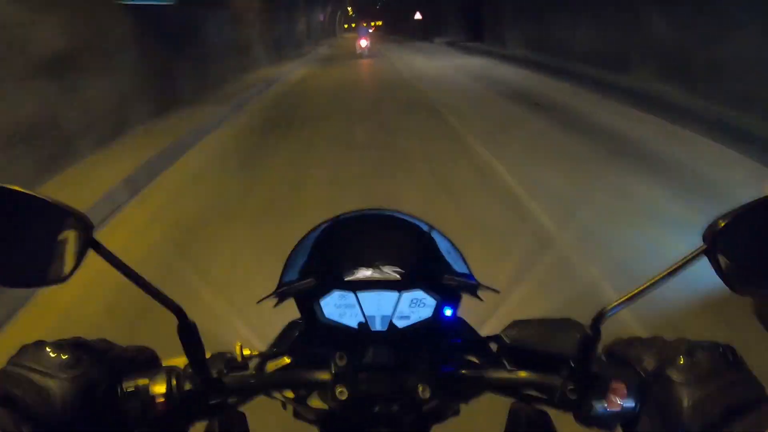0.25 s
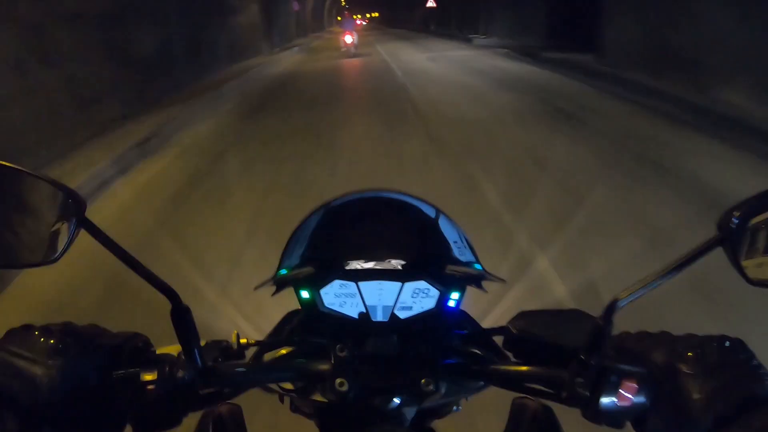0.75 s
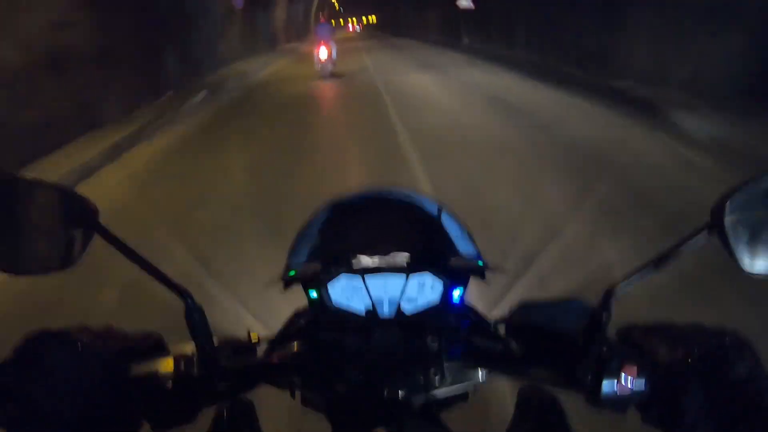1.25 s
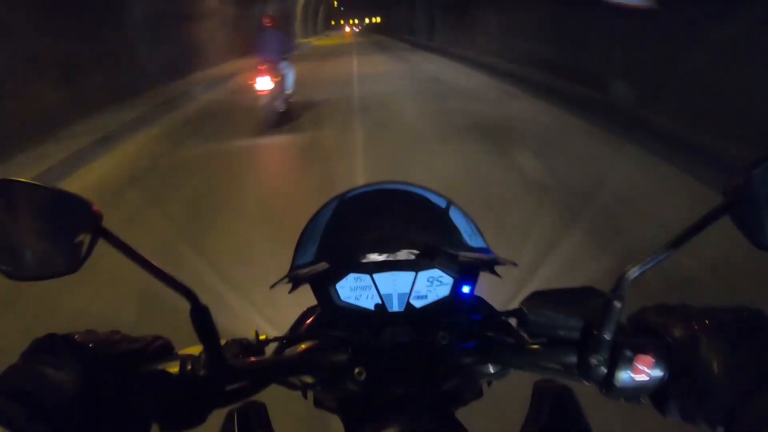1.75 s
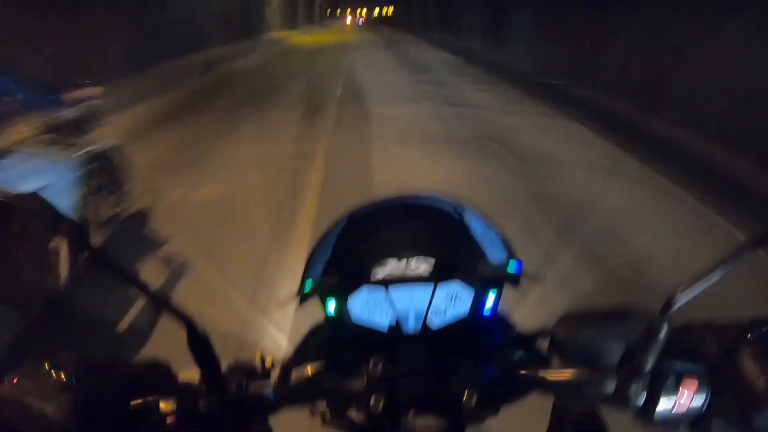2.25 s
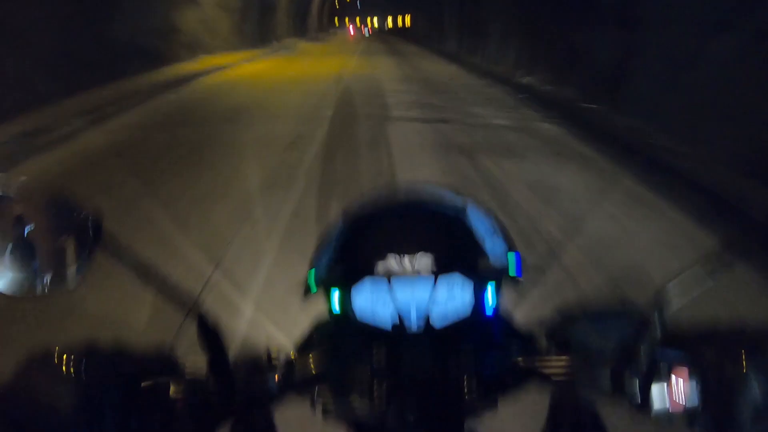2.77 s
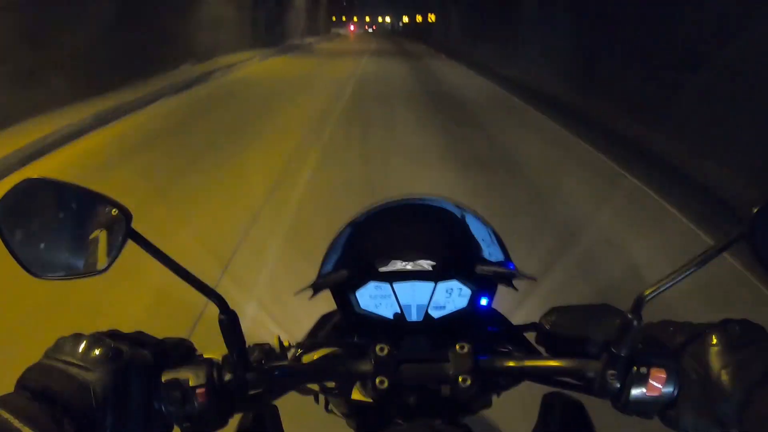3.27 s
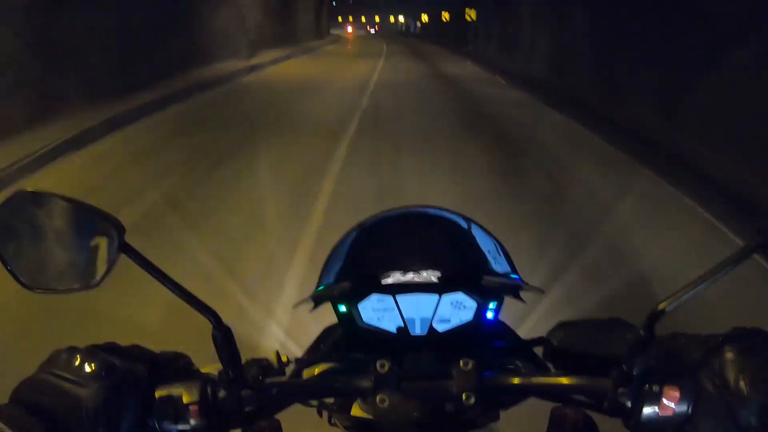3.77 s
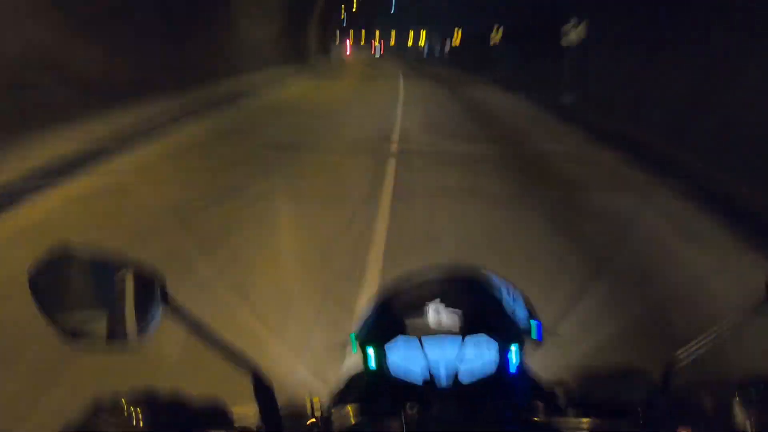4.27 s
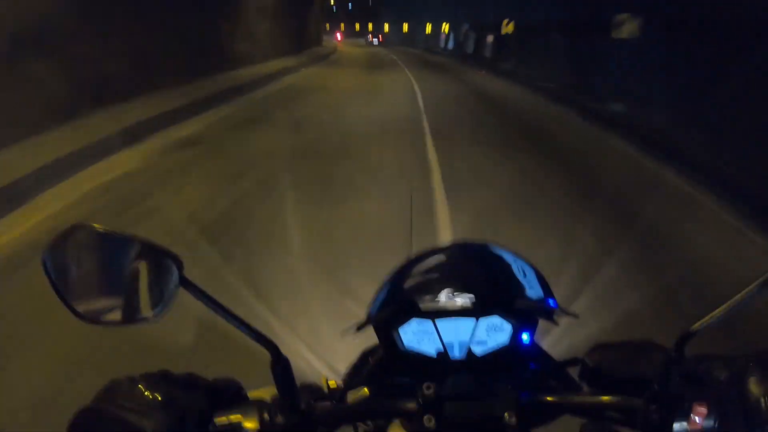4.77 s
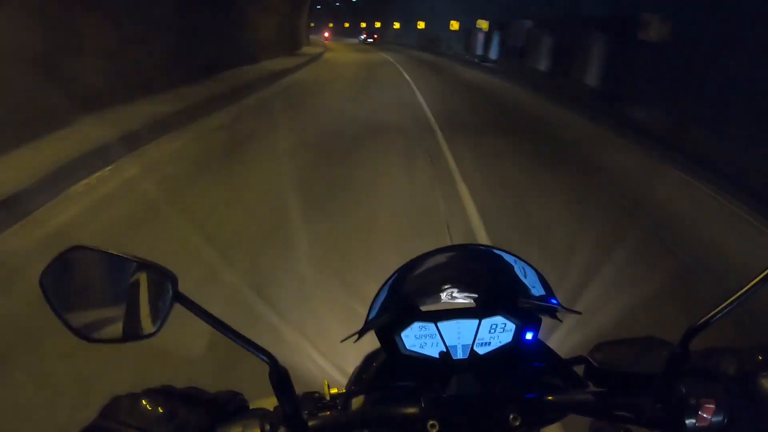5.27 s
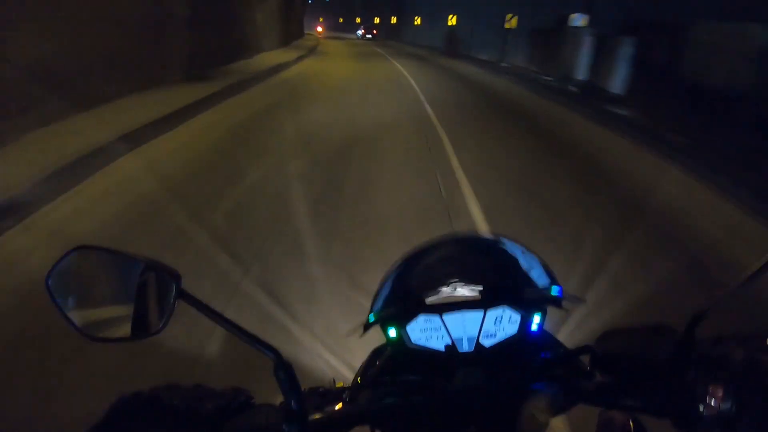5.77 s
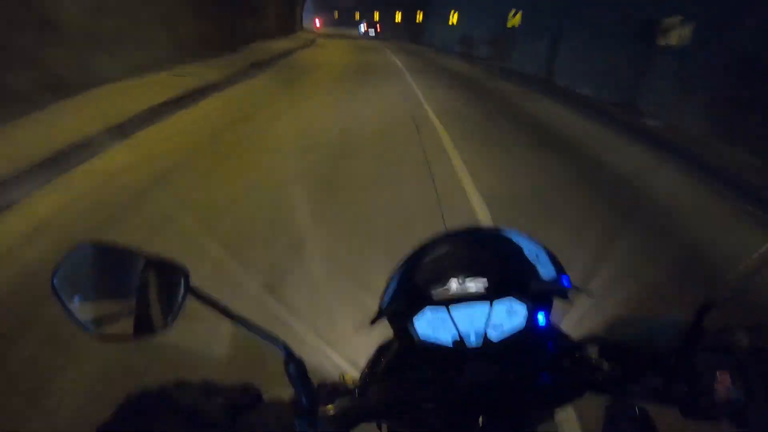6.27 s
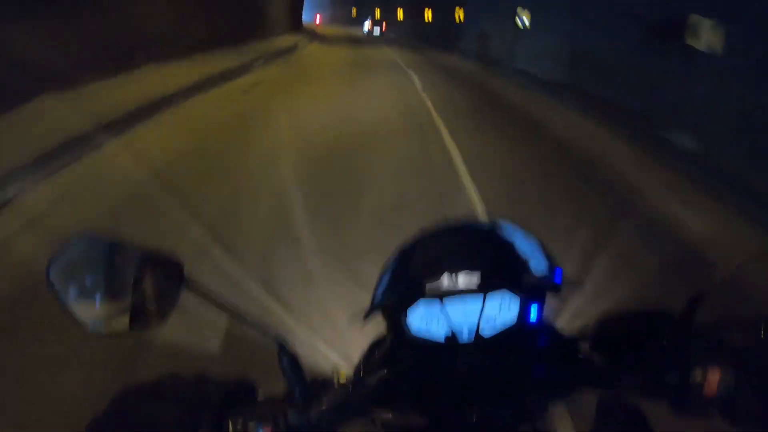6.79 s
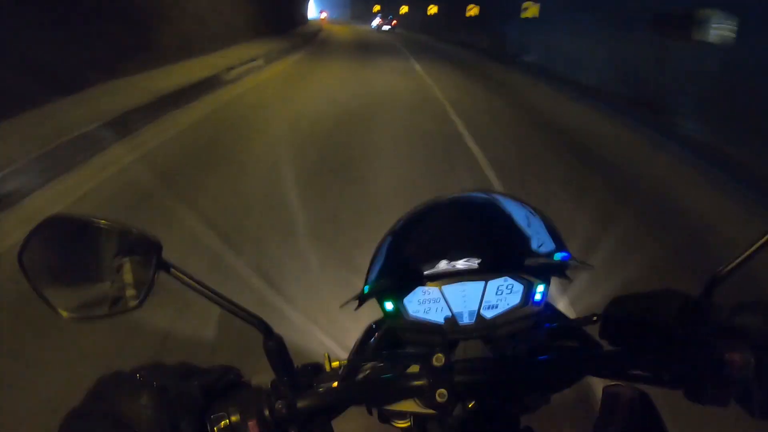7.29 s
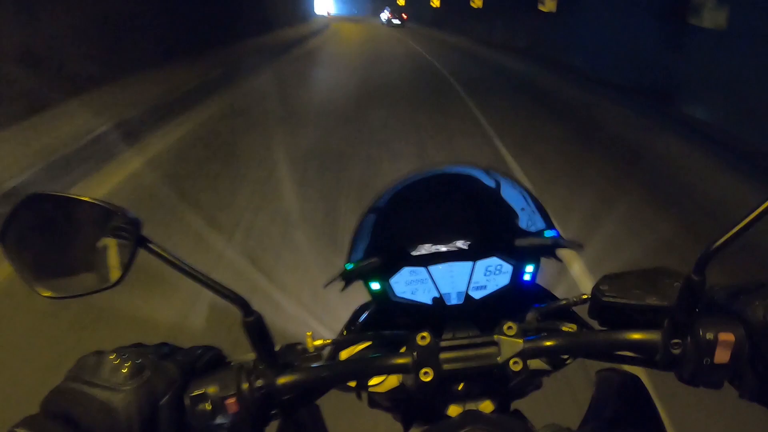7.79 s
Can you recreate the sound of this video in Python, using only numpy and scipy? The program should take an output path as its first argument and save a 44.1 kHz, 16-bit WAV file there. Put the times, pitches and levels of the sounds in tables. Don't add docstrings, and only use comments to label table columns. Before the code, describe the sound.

A motorcycle engine pulls hard inside a road tunnel, surges twice, then coasts down in pitch amid tyre roar and wind buffeting the microphone.

```python
import sys
import numpy as np
from scipy import signal
from scipy.fft import rfft, irfft, next_fast_len
from scipy.io import wavfile

SR = 44100
rng = np.random.default_rng(int(sys.argv[2]) if len(sys.argv) > 2 else 0)


def voltage_ratio(level):
    return 10 ** (np.asarray(level, float) / 20)


def wav_record(signal):
    frames = np.transpose(np.atleast_2d(signal))
    bounded = np.clip(frames, -1, 1)
    quanta = np.round(bounded * 32767).astype(np.int16)
    wavfile.write(sys.argv[1], SR, quanta)


N = 354563
TIME_S = np.arange(N) / SR

# time in seconds, firing rate in Hz.
FIRING_RATE = [(0, 186), (.25, 191), (1.0, 197.5), (1.35, 204.5), (1.62, 213.8), (2.1, 211.2), (2.6, 202.8),
               (2.78, 204), (2.95, 209.6), (3.25, 211.4), (3.8, 206), (4.3, 195.8), (5.0, 184),
               (5.6, 175.2), (6.45, 161.8), (7.0, 152.6), (7.75, 148.6), (8.04, 149.4)]
# time in seconds, throttle 0-1.
THROTTLE = [(0, 0.76), (.4, 0.76), (.9, 0.71), (1.15, 0.95), (1.5, 0.91), (1.86, 0.85), (2.0, 0.4),
            (2.2, 0.22), (2.66, 0.11), (2.76, 0.64), (3.05, 0.91), (3.33, 0.68), (3.55, 0.37), (4.1, 0),
            (4.6, 0), (5.5, 0.23), (7.0, 0), (7.55, 0.22), (7.74, 0.43), (8.04, 0.5)]
# multiple of the firing rate, level in dB within the group.
GROWL_ORDERS = [(3, 2.5)]
# multiple of the firing rate, level in dB within the group.
BARK_ORDERS = [(4, -3), (5, -3.5), (6, -2.5), (7, -3), (8, -6.5), (9, -10.5)]
# multiple of the firing rate, level in dB.
CRANK_ORDERS = [(.25, -43.5), (.5, -31), (.75, -50)]
# centre in Hz, width in Hz, level in dB against the bark.
AIR_BOX = [(2723, 390, -8.5), (5370, 140, -25)]
# frequency in Hz, level in dB.
SILENCER = [(149, -19.5), (154, -21.5), (161, -10.5), (168, -19.5), (176, -13.5), (186, -13), (197, -11),
            (212, -10.5)]
# frequency in Hz, level in dB.
TAIL_PIPE = [(297, -15), (304, -12), (320, -17), (336, -19.5), (352, -30), (385, -25.5), (405, -30.5),
             (425, -30.5)]
# frequency in Hz, level in dB.
HEADER = [(445, -40), (480, -45.5), (540, -44.5), (575, -40), (600, -50), (635, -49)]
# frequency in Hz, level in dB.
SIDE_COVER = [(187, -39.5), (207, -26.5), (222, -9), (232, -37), (247, -17), (256, -24), (266, -16)]
# time in seconds, share 0-1.
SCATTER = [(0, .4), (1.9, .55), (2.05, .2), (2.7, .25), (3.5, .6), (4.1, .3), (5.5, .3), (6, .2),
           (8.04, .12)]
# time in seconds, change in dB, length in seconds.
WALL_BAYS = [(0.127, 1.5, .15), (0.744, -6.5, .1), (1.037, -9.5, .1), (1.593, 6.5, .1), (1.912, -8.5, .08),
             (2.197, 4, .06), (2.52, 1.5, .08), (3.06, 9, .07), (3.343, -3, .1), (3.547, 5.5, .05),
             (3.877, -6.5, .05), (4.74, -4.5, .06), (5.01, -2.5, .08), (5.605, 4, .08), (6.872, 4.5, .06),
             (7.6, 1, .08)]
# time in seconds, level in dB.
AIRFLOW = [(0.0, -39.5), (0.02, -44), (0.65, -42), (0.71, -43.5), (1.19, -39.5), (2.75, -45.5), (3.0, -43),
           (3.78, -46.5), (3.94, -45.5), (4.5, -50), (5.51, -45), (5.75, -47.5), (6.2, -45), (7.37, -47.5),
           (7.45, -51), (7.68, -50.5), (8.02, -55.5), (8.04, -48.5)]
# time in seconds, level in dB.
GUSTS = [(0.0, -24), (0.2, -17.5), (1.34, -13), (1.36, -22.5), (1.61, -17), (1.77, -24), (1.81, -17),
         (2.57, -23), (2.84, -17.5), (4.66, -24), (5.1, -17), (5.78, -23), (5.87, -14), (6.54, -25),
         (7.14, -12), (8.04, -20.5)]
# frequency in Hz, density in dB per Hz.
BUFFET_COLOUR = [(4, -4.5), (10, 6), (22, 0), (50, -5.5), (72, -9.5), (112, -8.5), (135, -8), (200, -19),
                 (330, -19.5), (500, -49.5)]
# frequency in Hz, density in dB per Hz.
ROAR_COLOUR = [(100, -21.5), (200, 4.5), (330, 1), (450, 3), (600, -3), (900, -7.5), (1300, -11),
               (1800, -11), (2100, -27), (3000, -61)]
# frequency in Hz, density in dB per Hz.
RASP_COLOUR = [(500, -26), (900, 6), (1400, 11.5), (1800, 5.5), (2200, 0), (3000, -0.5), (3600, -4.5),
               (4000, -6.5), (4600, -37.5)]
# frequency in Hz, density in dB per Hz.
HISS_COLOUR = [(2500, -22.5), (4000, -2.5), (5000, 3.5), (6100, 0), (7000, -2), (8000, -4.5), (10000, -7.5),
               (12000, -13), (14000, -18.5), (15700, -36)]
# time in seconds, knock in dB, rattle in dB, length in seconds.
JOLTS = [
    (2.535, -33, -45, .02),
    (2.78, -36, -46, .012),
    (3.22, -36, -48, .015),
    (3.48, -38, -48, .015),
    (4.174, -25, -50, .014),
    (4.33, -31, -49, .016),
    (5.07, -36, -54, .04),
    (3.98, -35, -54, .06),
]
# frequency in Hz, density in dB per Hz.
KNOCK_COLOUR = [(600, -16), (1100, -3), (1700, 0), (2200, -10), (3200, -17), (4000, -23), (5000, -30)]
# centre in Hz, width in Hz, depth in dB.
HOUSING_DIPS = [(4140, 800, -6.5), (5600, 270, -7)]


def rms_one(x):
    return x / np.sqrt(np.mean(np.abs(x) ** 2) + 1e-20)


def in_time(rows):
    time_s, value = np.transpose(rows)
    return np.interp(TIME_S, time_s, value)


def at_hz(points, hz):
    point_hz, point_db = np.transpose(points)
    return np.interp(np.log(hz), np.log(point_hz), point_db)


def bell(centre_s, length_s):
    return np.exp(-((TIME_S - centre_s) / length_s) ** 2)


def drift(rate_hz):
    pole = np.exp(-2 * np.pi * rate_hz * 20 / SR)
    noise = rng.standard_normal(N // 20 + 4002)
    slow = signal.lfilter([1], [1, -2 * pole, pole ** 2], noise)[4000:]
    return np.interp(np.arange(N) / 20, np.arange(len(slow)), rms_one(slow))


def coloured(points):
    size = next_fast_len(N)
    hz = np.maximum(np.fft.rfftfreq(size, 1 / SR), 1)
    point_hz, point_db = np.transpose(points)
    gain_db = np.interp(np.log(hz), np.log(point_hz), point_db, left=-120, right=-120)
    return rms_one(irfft(rfft(rng.standard_normal(size)) * voltage_ratio(gain_db), size)[:N])


def tone(phase, scatter, width_hz):
    share = np.clip(scatter, 0, 1)
    in_step = np.sqrt(1 - share) + np.sqrt(share / 2) * drift(width_hz)
    across = np.sqrt(share / 2) * drift(width_hz)
    return np.sqrt(2) * (in_step * np.cos(phase) + across * np.sin(phase))


def resonance(hz, scatter, width_hz):
    return tone(2 * np.pi * hz * TIME_S, scatter, width_hz)


def buffeting():
    gust_db = in_time(GUSTS)
    level_db = -17.5 + 0.83 * (gust_db - gust_db.mean()) + 0.75 * drift(1.1)
    out = voltage_ratio(level_db) * coloured(BUFFET_COLOUR)
    out += voltage_ratio(level_db - 13.5) * resonance(43.9, scatter=1, width_hz=6.7)
    return out + voltage_ratio(level_db - 9.5) * resonance(112, scatter=0.93, width_hz=5)


def screen_boom(first_db):
    level_db = -20.5 + 0.7 * (first_db - first_db.mean()) + 1.5 * drift(2.3)
    return voltage_ratio(level_db) * resonance(215, scatter=0.99, width_hz=22.7)


def airflow_hiss(flow_db, gust):
    level_db = -47 + 0.95 * flow_db + 0.28 * gust + 0.5 * drift(13)
    return voltage_ratio(level_db) * coloured(HISS_COLOUR)


def tyre_roar(flow_db, speed_hz, throttle):
    level_db = -26.5 + 0.7 * flow_db + 2 * throttle + 0.0265 * speed_hz + 0.38 * drift(18)
    return voltage_ratio(level_db) * coloured(ROAR_COLOUR)


def rasp(phase, flow_db, speed_hz, throttle, gust):
    level_db = -34 + 0.7 * flow_db - 0.5 * throttle + 0.0823 * speed_hz
    level_db += 0.15 * gust + 1.1 * drift(9.9)
    puff = 1 + 0.22 * throttle ** 2 * np.cos(phase)
    return voltage_ratio(level_db) * puff * coloured(RASP_COLOUR)


def chain_whirr(flow_db, speed_hz):
    return voltage_ratio(-49 + flow_db - 0.14 * speed_hz) * resonance(3195, scatter=1, width_hz=280)


def jolts():
    knock = sum(voltage_ratio(knock_db) * bell(s, length_s) for s, knock_db, _, length_s in JOLTS)
    rattle = sum(voltage_ratio(rattle_db) * bell(s, length_s) for s, _, rattle_db, length_s in JOLTS)
    return knock * coloured(KNOCK_COLOUR) + rattle * coloured(HISS_COLOUR)


def wall_echoes(phase, first_db, second_db):
    ahead = voltage_ratio(first_db - 8) * tone(1.1 * phase, scatter=1, width_hz=9)
    behind = voltage_ratio(second_db - 8) * tone(1.8 * phase, scatter=0.99, width_hz=14)
    return ahead + behind


def uneven_cylinders(phase, firing_hz, throttle):
    quarter_db = at_hz(SIDE_COVER, 5 / 4 * firing_hz) - 7.5 * throttle
    half_db = -35.5 + 8.5 * throttle
    out = voltage_ratio(quarter_db) * tone(5 / 4 * phase, scatter=0.69, width_hz=2.4)
    return out + voltage_ratio(half_db) * tone(3 / 2 * phase, scatter=0.4, width_hz=6)


def crank(phase):
    return sum(voltage_ratio(db) * tone(k * phase, scatter=1, width_hz=6.3) for k, db in CRANK_ORDERS)


def air_box(firing_hz, bark_db):
    drive_db = bark_db + 0.28 * (bark_db + 24) + 0.34 * (firing_hz - firing_hz.max())
    return sum(voltage_ratio(drive_db + db) * resonance(hz, 1, width_hz) for hz, width_hz, db in AIR_BOX)


def exhaust(phase, firing_hz, throttle, first_db, second_db, bark_db):
    share = in_time(SCATTER)
    overrun = .012 * np.maximum(firing_hz - 156, 0) * (1 - throttle)
    pulse = phase + .12 * drift(14)
    growl_db = at_hz(HEADER, 3 * firing_hz) + 21.5 * throttle
    out = voltage_ratio(first_db) * tone(phase, .65 * share, width_hz=17)
    out += voltage_ratio(second_db) * tone(2 * phase, share + overrun, width_hz=17)
    for k, db in GROWL_ORDERS:
        out += voltage_ratio(growl_db + db) * tone(k * pulse, scatter=.28, width_hz=22)
    for k, db in BARK_ORDERS:
        out += voltage_ratio(bark_db + db) * tone(k * pulse, scatter=.36, width_hz=5 * k)
    return out


def scene():
    firing_hz = in_time(FIRING_RATE)
    throttle = np.clip(in_time(THROTTLE), 0, 1)
    phase = 2 * np.pi * np.cumsum(firing_hz) / SR
    first_db = at_hz(SILENCER, firing_hz) - 8.5 * throttle
    first_db += sum(db * bell(s, length_s) for s, db, length_s in WALL_BAYS)
    second_db = at_hz(TAIL_PIPE, 2 * firing_hz) + 11 * throttle
    bark_db = -53.5 + 29.5 * throttle

    flow_db = in_time(AIRFLOW)
    flow_db = flow_db - flow_db.mean()
    speed_hz = firing_hz - firing_hz.mean()
    gust = drift(11)

    mix = buffeting() + screen_boom(first_db)
    mix += airflow_hiss(flow_db, gust)
    mix += tyre_roar(flow_db, speed_hz, throttle)
    mix += rasp(phase, flow_db, speed_hz, throttle, gust)
    mix += chain_whirr(flow_db, speed_hz) + jolts()
    mix += wall_echoes(phase, first_db, second_db)
    mix += uneven_cylinders(phase, firing_hz, throttle)
    mix += crank(phase) + air_box(firing_hz, bark_db)
    mix += exhaust(phase, firing_hz, throttle, first_db, second_db, bark_db)
    return mix[None]


def top_cut(x):
    return signal.sosfilt(signal.butter(12, 15719, fs=SR, output="sos"), x)


def record(dry):
    x = dry
    for hz, width_hz, depth_db in HOUSING_DIPS:
        b, a = signal.iirpeak(hz, hz / width_hz, fs=SR)
        x = x - (1 - voltage_ratio(depth_db)) * signal.lfilter(b, a, x)
    power = signal.lfilter([.0008], [1, -1 + 0.00071], x ** 2) + 1e-6
    x = x * np.minimum(1, (voltage_ratio(-11.5) / power) ** 0.28)
    x = 1.07 * np.tanh(x / 1.07)
    return top_cut(x)


dry = scene()
out = record(dry)
wav_record(out)
```